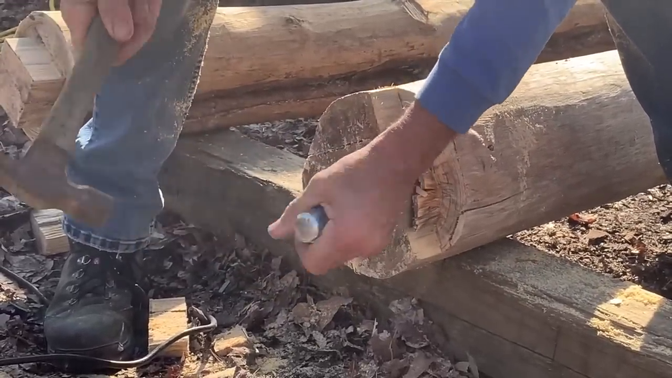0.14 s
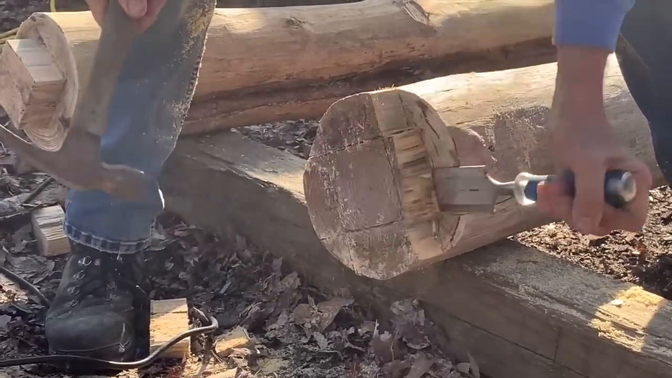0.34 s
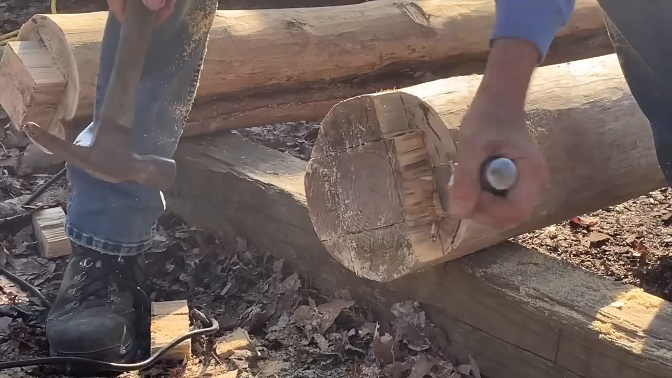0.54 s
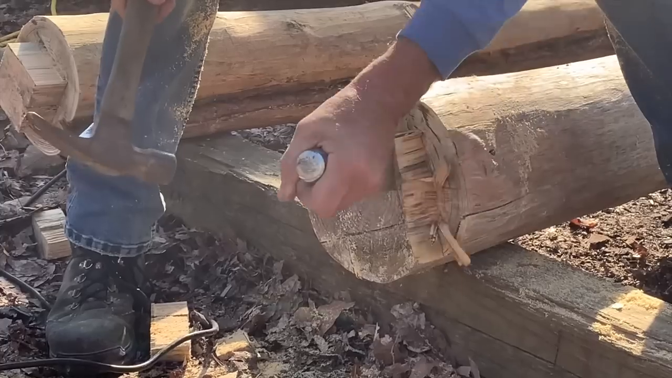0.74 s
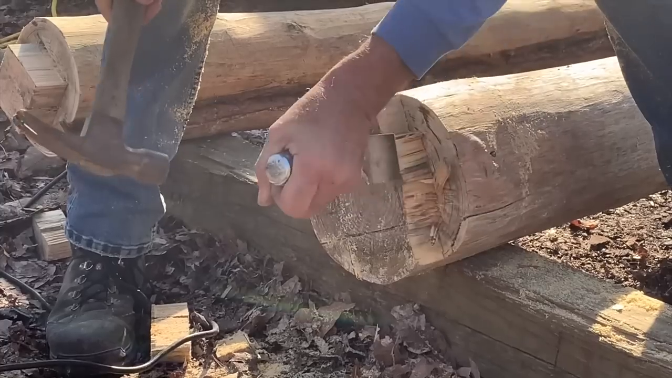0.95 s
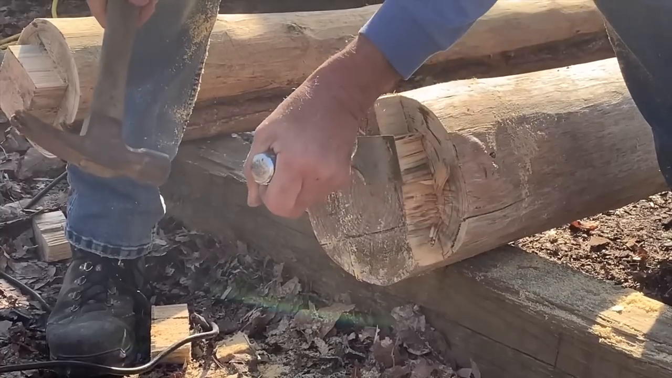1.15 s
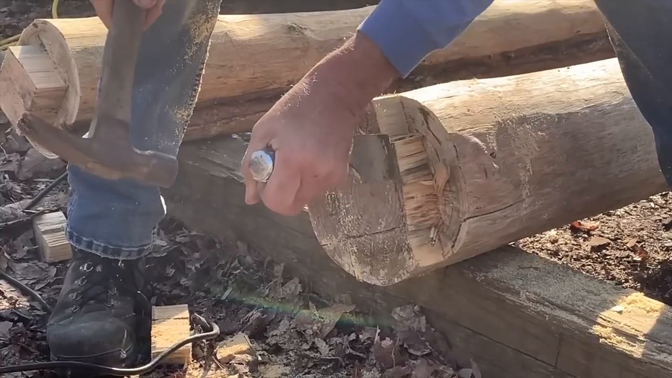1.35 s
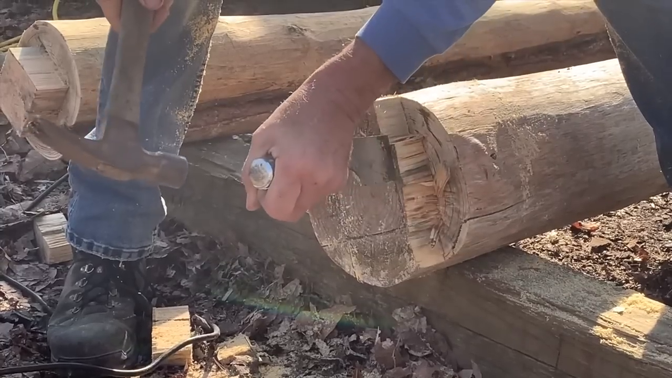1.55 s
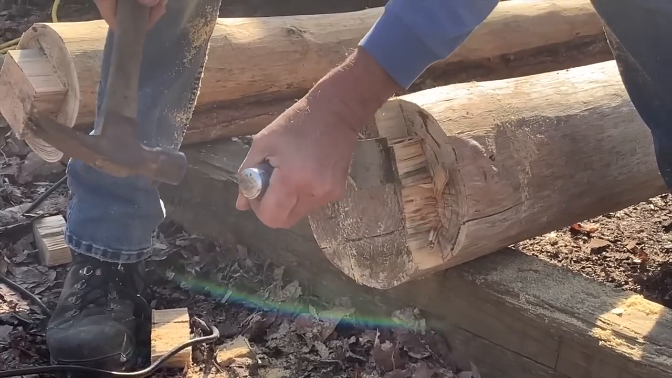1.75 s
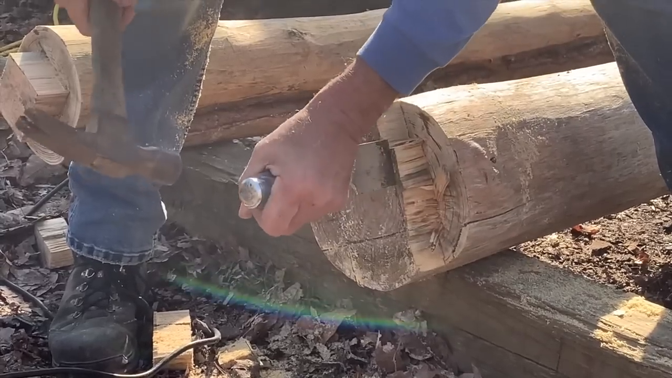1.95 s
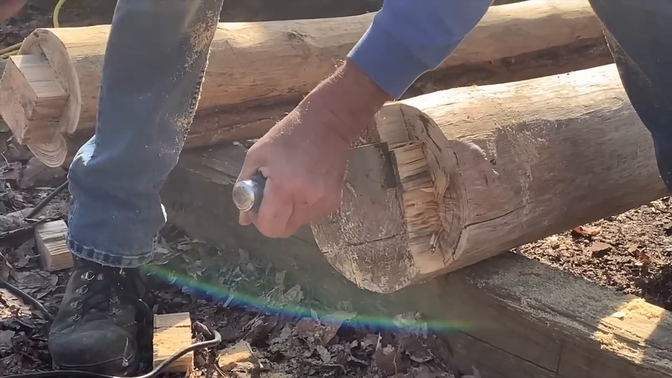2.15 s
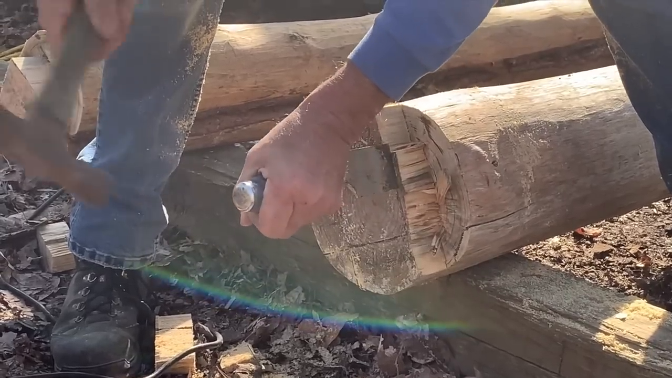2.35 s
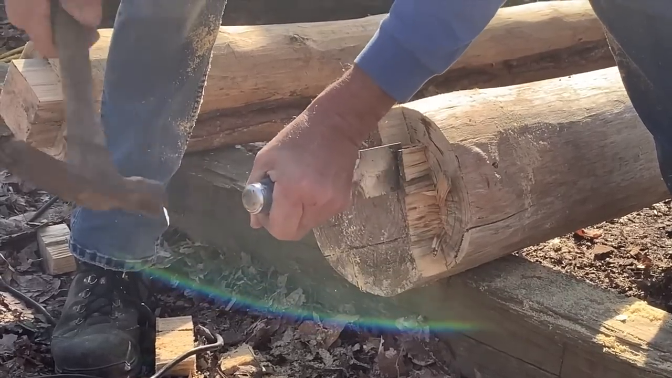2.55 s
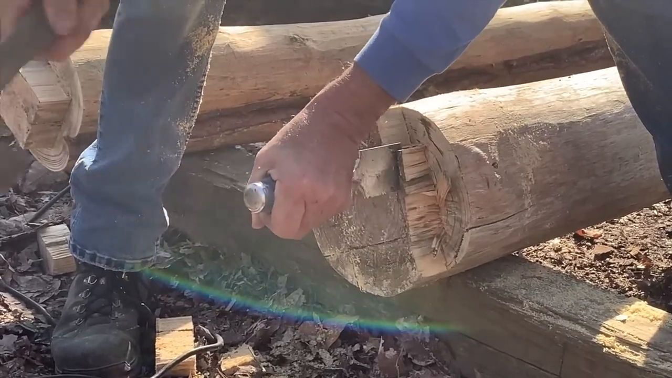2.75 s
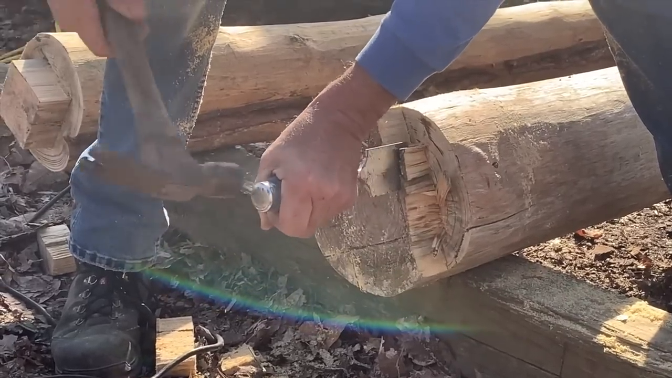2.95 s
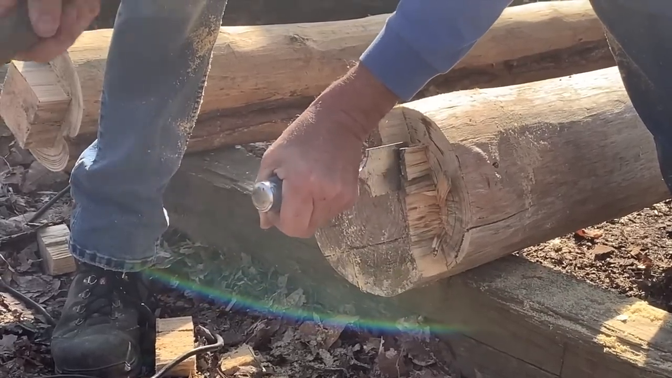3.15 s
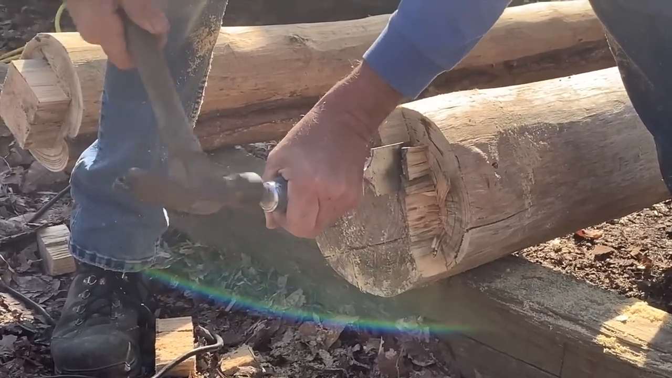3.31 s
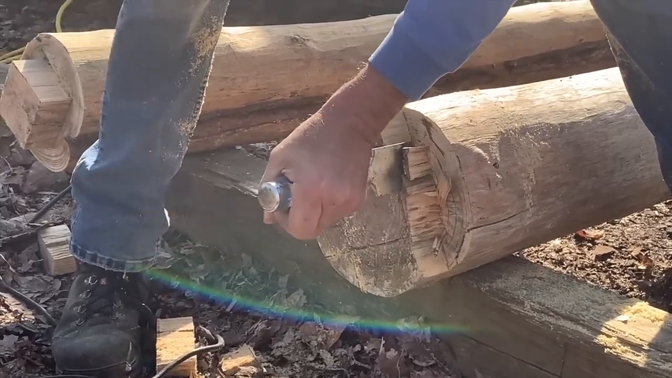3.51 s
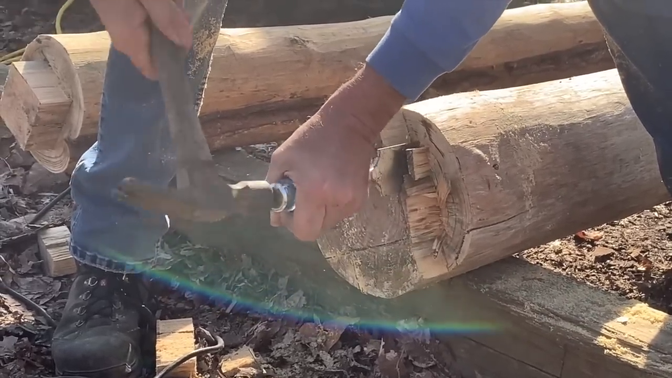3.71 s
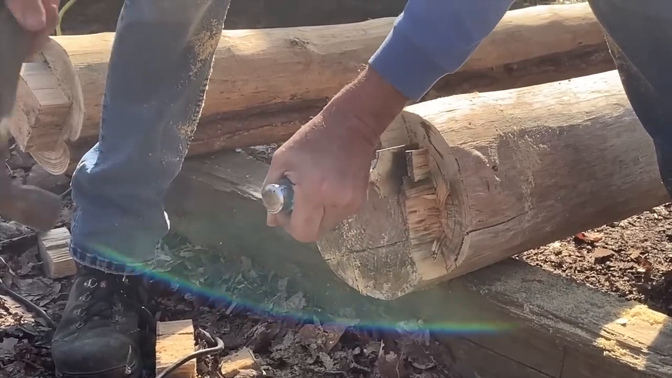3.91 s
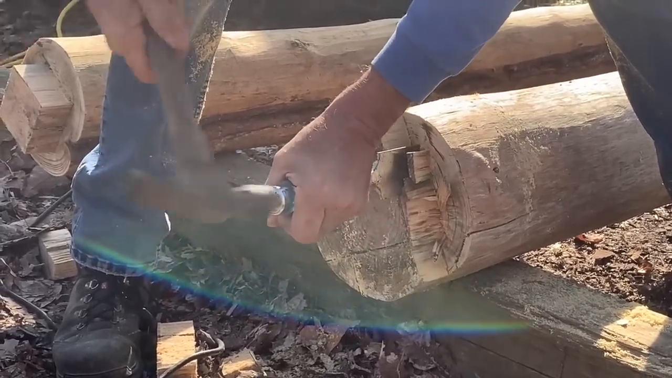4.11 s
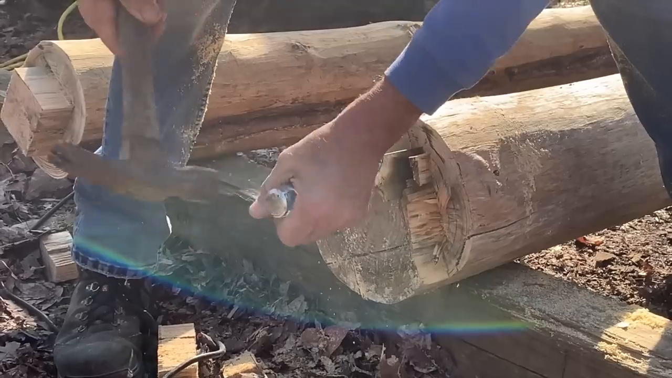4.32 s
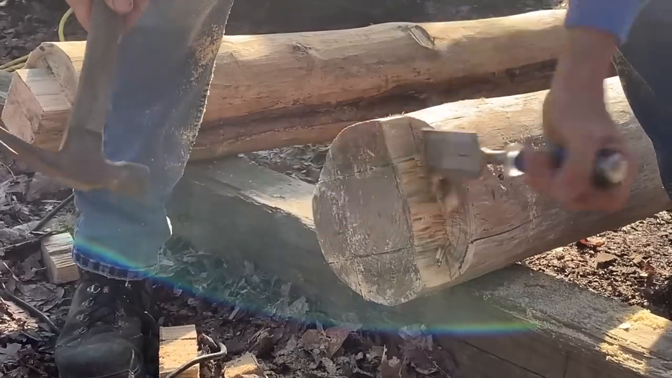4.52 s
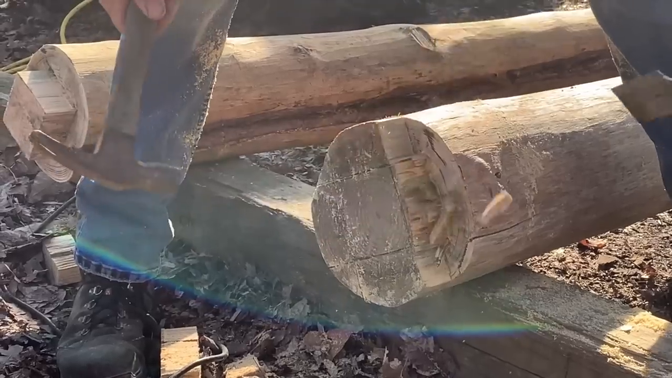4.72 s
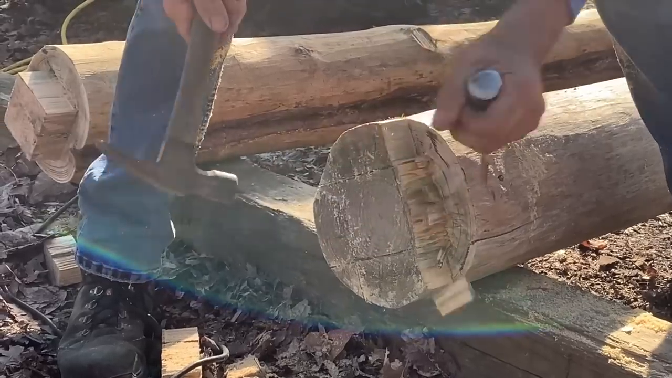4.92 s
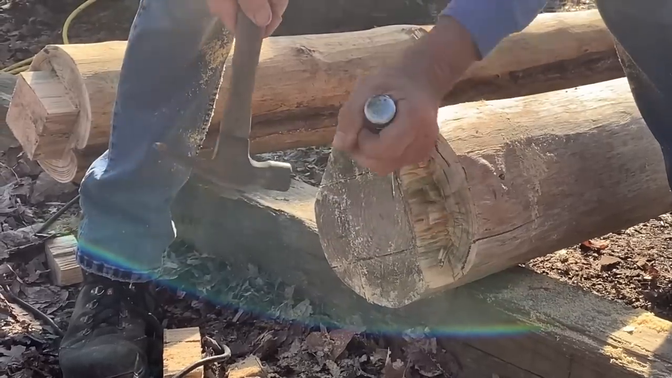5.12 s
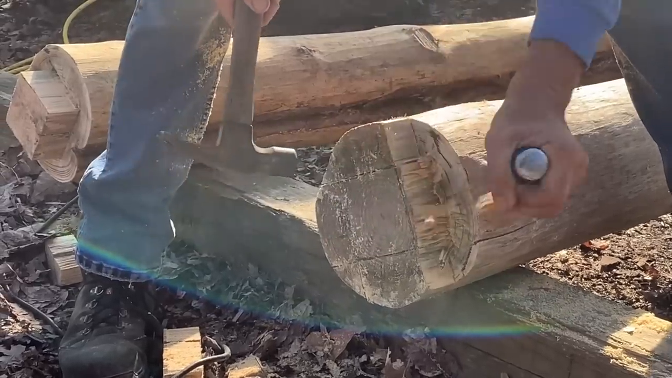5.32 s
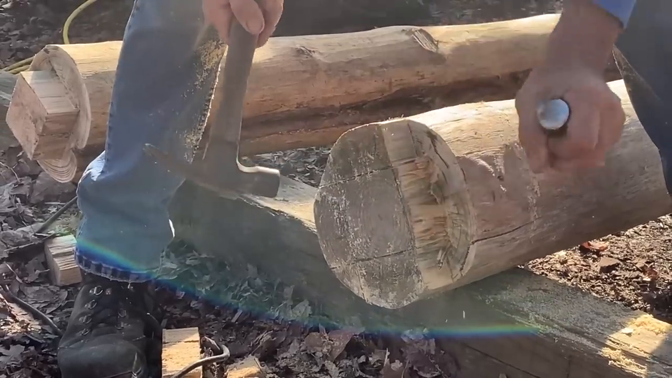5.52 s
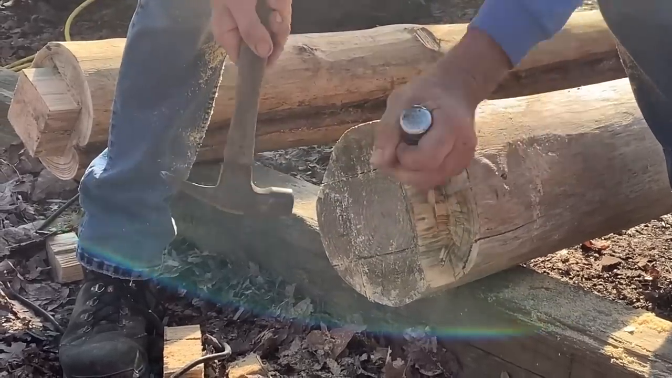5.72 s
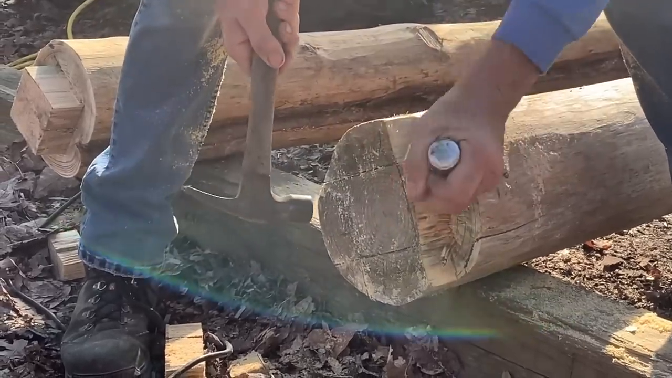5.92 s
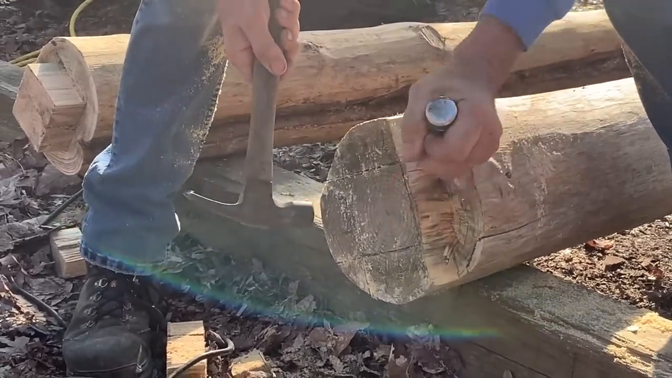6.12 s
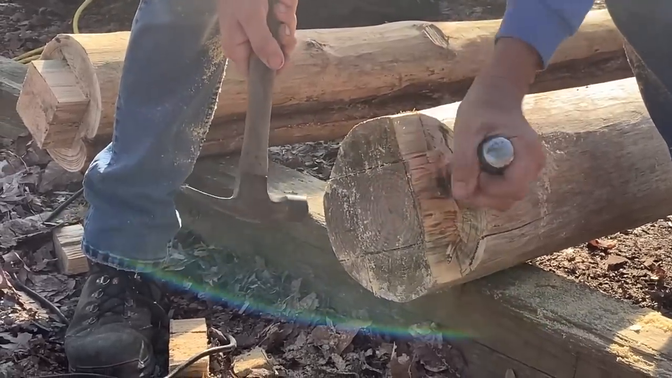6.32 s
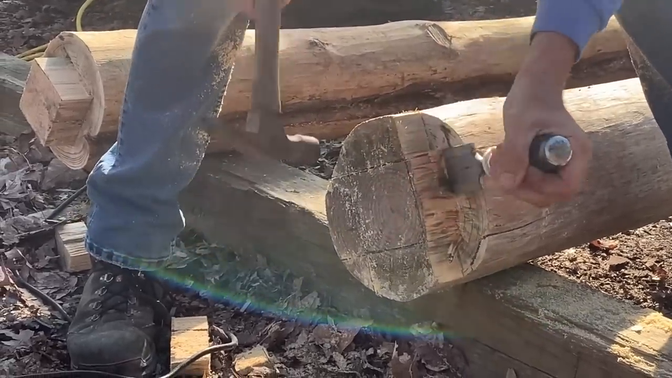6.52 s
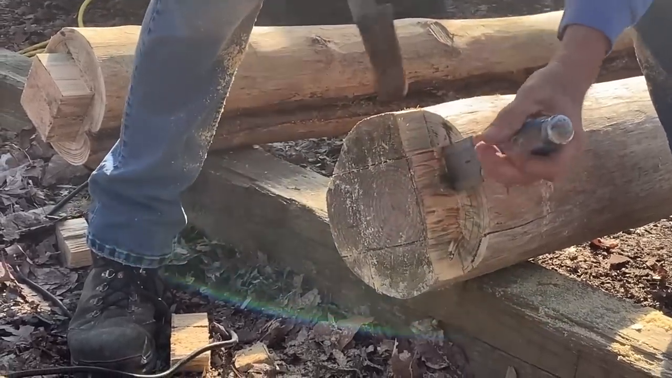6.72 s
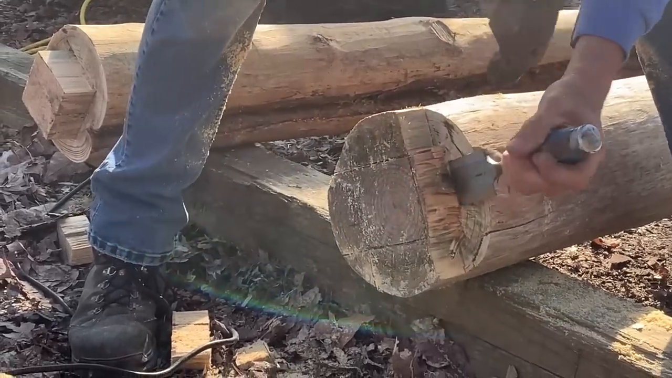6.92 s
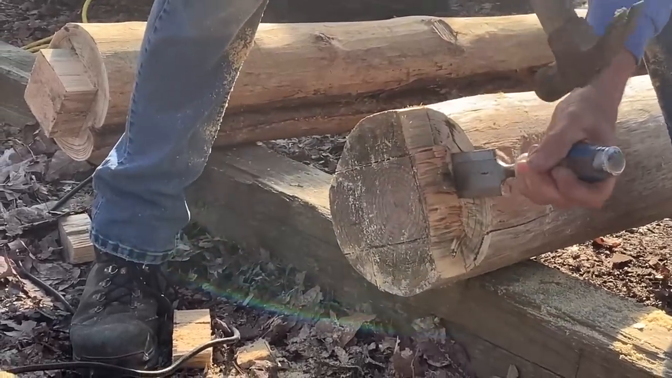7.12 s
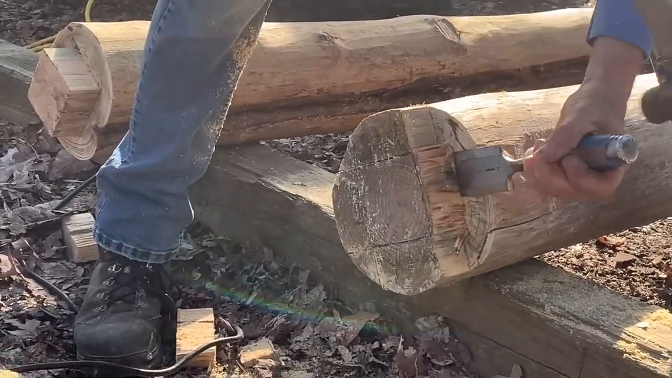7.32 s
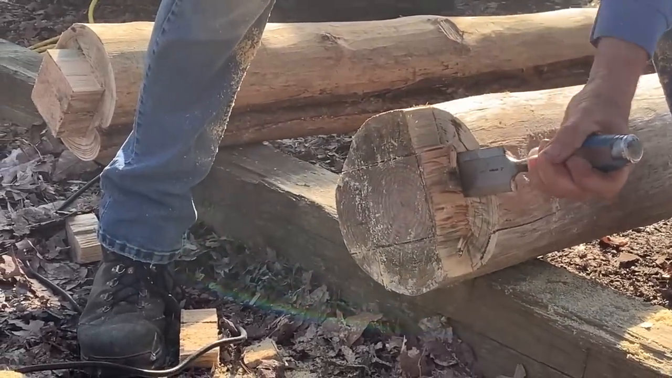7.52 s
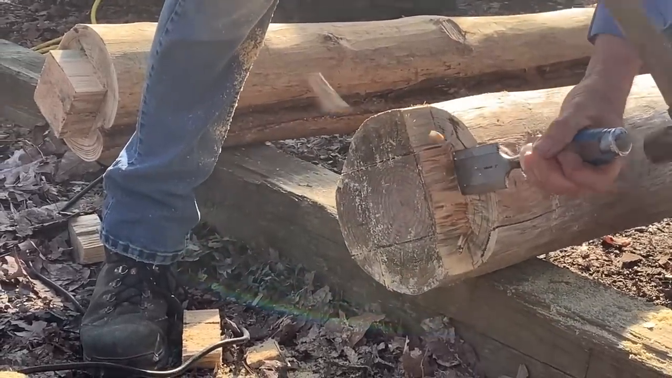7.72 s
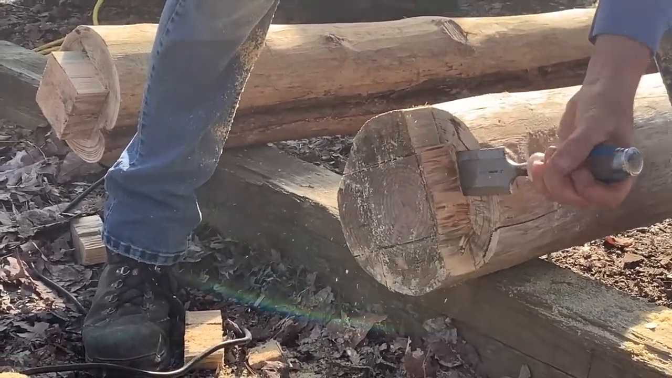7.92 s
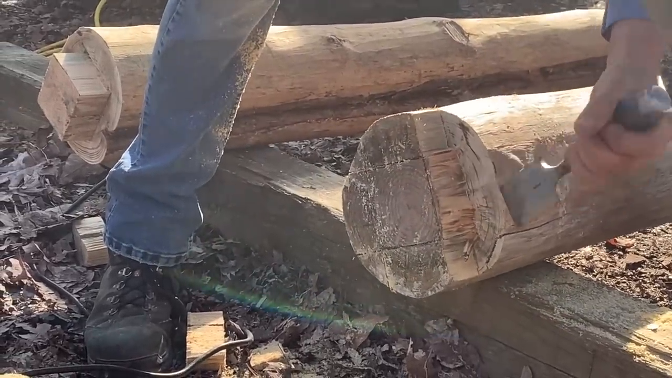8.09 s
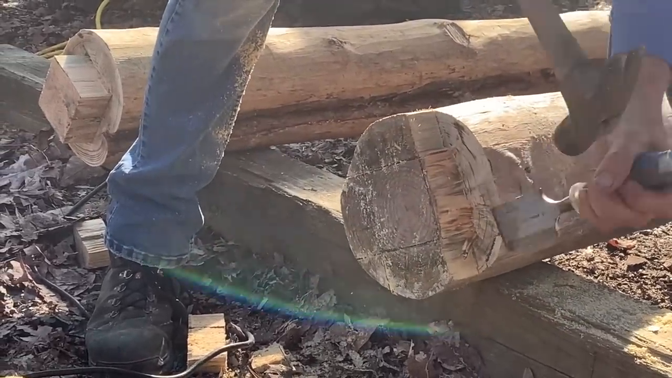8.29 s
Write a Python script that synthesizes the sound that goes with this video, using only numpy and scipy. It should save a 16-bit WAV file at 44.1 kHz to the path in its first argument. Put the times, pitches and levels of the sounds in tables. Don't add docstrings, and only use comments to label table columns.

```python
import sys
import numpy as np
from scipy import signal
from scipy.fft import rfft, irfft, next_fast_len
from scipy.io import wavfile
from scipy.ndimage import uniform_filter1d

SR = 44100
rng = np.random.default_rng(int(sys.argv[2]) if len(sys.argv) > 2 else 0)


def log_audio(samples):
    frames = np.atleast_2d(samples).T
    limited = np.clip(frames, -1, 1)
    pcm = np.round(limited * 32767).astype(np.int16)
    wavfile.write(sys.argv[1], SR, pcm)


def to_linear_factor(level_db):
    exponent = np.asarray(level_db, float) / 20
    return 10 ** exponent


N = 368235


def evened(x):
    return x / np.sqrt(np.mean(x ** 2) + 1e-20)


def read(points, hz, axis=1):
    columns = np.transpose(points)
    return np.interp(np.log(hz + 1), np.log(columns[0] + 1), columns[axis])


def humps(bands, hz):
    return sum(db * np.exp(-((hz - centre_hz) / width_hz) ** 2) for centre_hz, width_hz, db in bands)


def add(mix, s, sound):
    part = mix[max(round(s * SR), 0):][:len(sound)]
    part += sound[:len(part)]


def laid(source, rows):
    mix = np.zeros(N)
    for row in rows:
        add(mix, row[0], source(*row))
    return mix


def resonate(x, hz, width_hz):
    turn = np.exp(2j * np.pi * np.cumsum(hz * np.ones(len(x))) / SR)
    r = np.exp(-np.pi * abs(width_hz) / SR)
    return 2 * (turn * signal.lfilter([1 - r], [1, -r], x / turn)).real


def resonate_twice(x, hz, width_hz):
    return resonate(resonate(x, hz, width_hz), hz, width_hz)


def smooth_patches(shape, bands, frames):
    noise = rng.standard_normal(shape[::-1]).T
    return evened(uniform_filter1d(uniform_filter1d(noise, bands, axis=0), frames, axis=1))


def shaped(gain, same, size):
    z = rng.standard_normal((gain.shape[1], len(gain), 4)).T
    left, other = z[0] + 1j * z[1], z[2] + 1j * z[3]
    same = np.clip(same, 0, 1)
    right = same * left + np.sqrt(1 - same ** 2) * other
    return signal.istft(gain * np.array([left, right]), nperseg=size)[1]


# time in seconds, level in dB.
RUMBLE = [(0.0, -69.5), (1.35, -71.5), (1.93, -74.5), (2.74, -72.5), (3.1, -66), (3.63, -74.5), (4.35, -68),
          (4.84, -74), (5.16, -68.5), (5.81, -75), (6.09, -65), (7.18, -70), (7.8, -65), (8.35, -68.5)]
# frequency in Hz, common share.
ROAD_SAME = [(30, 0.38), (150, 0.19), (500, 0.46), (1500, 0.043), (6000, 0.057)]
# frequency in Hz, density in dB per Hz.
ROAD = [(20, -32.5), (48, -3), (99, -6), (131, -20), (250, -37.5), (700, -35), (2580, -57.5), (16500, -75)]
# centre in Hz, width in Hz, lift in dB.
ROAD_BANDS = [(557, 110, 6.5), (870, 170, 4), (229, 35, -3.5), (713, 43, -4.5), (5070, 1000, -4),
              (11000, 6400, 9)]


def road():
    hz = np.fft.rfftfreq(2048, 1 / SR)[:, None]
    t = np.arange(N // 1024 + 3) * 1024 / SR
    swell_db = np.interp(t, *np.transpose(RUMBLE)) + 63
    patches = smooth_patches((len(hz), len(t)), 14, 4)
    gusts = smooth_patches((64, len(t)), 2, 6)
    gusts = np.pad(gusts, [(0, len(hz) - len(gusts)), (0, 0)])
    busier_db = np.interp(t, [2.3, 5.8, 8.3], [0, 2, 3])
    level_db = read(ROAD, hz) + humps(ROAD_BANDS, hz) + 0.48 * patches
    level_db = level_db + 3.5 * gusts / (1 + (hz / 400) ** 2)
    level_db = level_db + swell_db / (1 + (hz / 160) ** 4) + busier_db * (hz > 150)
    return to_linear_factor(-87) * shaped(to_linear_factor(level_db), read(ROAD_SAME, hz), 2048)[:, :N] * to_linear_factor([[27], [29]])


# start in seconds, rms in dB, length
# in seconds, pitch in Hz.
BRUSHES = [(0, -65.5, 0.045, 3200), (0, -74.5, 0.3, 2660), (0.192, -61, 0.17, 4303),
           (0.377, -80, 0.16, 3510), (0.272, -61, 0.053, 2500), (0.898, -65, 0.03, 6100),
           (1.689, -88, 0.076, 8970), (1.867, -92, .05, 9150), (4.529, -44, 0.035, 5985),
           (4.656, -85.5, 0.036, 8980), (4.827, -79, 0.022, 12200), (4.873, -67.5, 0.055, 3510),
           (5.034, -69, 0.042, 3200), (5.147, -72, 0.048, 3470), (5.29, -43.5, 0.039, 5600),
           (5.292, -67, 0.17, 1190), (5.57, -66, 0.032, 4500), (5.628, -78, 0.067, 8820),
           (5.848, -82, 0.024, 9840), (5.882, -47, 0.018, 1190), (6.387, -80, 0.025, 9930),
           (6.62, -76.5, 0.095, 4500), (6.802, -85.5, 0.14, 1677), (7.127, -90, 0.11, 1774),
           (7.018, -88.5, 0.052, 8700), (7.123, -90, 0.13, 7350), (8.331, -52, 0.02, 5000),
           (7.75, -67, .19, 500), (7.87, -65, 0.065, 800), (7.95, -69, .19, 700), (5.845, -68, .04, 14070),
           (5.64, -70, 0.026, 14000)]


def brush(s, db, length_s, hz):
    noise = rng.standard_normal((SR // 5, 2))[:round(length_s * SR)].T
    grain = noise[0] * to_linear_factor(4.1 * evened(uniform_filter1d(noise[1], 60)))
    sound = evened(resonate_twice(grain, hz, 1064 + 0.84 * hz))
    if hz > 3000:
        sound = sound + to_linear_factor(-0.5) * evened(resonate_twice(grain, 12000, 6000))
    fade = signal.windows.tukey(len(grain), 0.6) * to_linear_factor(np.linspace(4, -6, len(grain)))
    return to_linear_factor(db) * sound * fade


def snap(s, db, hz, bright_db, knock_db):
    t = np.arange(SR // 20) / SR
    crack_t60_ms, spike = 9.3, 0.99
    crack = rng.standard_normal(len(t)) * to_linear_factor(-60000 * t / crack_t60_ms) * (1 + spike * np.exp(-t / 0.00024))

    def band(hz, width_hz):
        return evened(resonate(resonate(crack, hz, width_hz), hz, 2 * width_hz))

    width_hz = 590 * max(hz / 4000, 1) ** 0.7
    body_db = -4.5 - 7.5 * abs(np.log2(hz / 4000))
    chip = band(hz, width_hz) + to_linear_factor(body_db) * (band(3600, 1800) + 0.17 * band(2250, 500))
    chip = chip + to_linear_factor(-3.5) * band(7200, 2700)
    low_cut = signal.butter(2, min(0.824 * hz, 2000), "high", fs=SR)
    chip = signal.lfilter(*low_cut, chip)
    bright = to_linear_factor(bright_db) * band(rng.uniform(8400, 10000), 4600) + to_linear_factor(bright_db - 6.5) * band(12000, 3000)
    knock = to_linear_factor(knock_db) * (band(930, 970) + 0.37 * band(1600, 2400))
    sound = chip + bright + knock
    return to_linear_factor(db) * sound / np.sqrt(uniform_filter1d(sound ** 2, size=22).max())


def snaps(rows, bright_db, knock_db):
    def one(s, db, hz):
        return snap(s, db, hz, bright_db + 4 * np.log2(hz / 4000), knock_db)
    return laid(one, rows)


# start in seconds, peak in dB, pitch in Hz.
TAPS = [(0.0604, -59, 5230), (0.903, -47.5, 7500), (3.7666, -27, 2160), (4.1916, -29, 2020),
        (4.3829, -46.5, 2350), (4.394, -49.5, 2370), (4.403, -31, 6015), (4.4322, -33.5, 1980),
        (4.554, -23, 4150), (4.5653, -37, 8000), (4.7404, -60.5, 1500), (4.761, -55, 1596),
        (4.8813, -47, 8400), (5.0373, -48, 1495), (5.155, -42.5, 7000), (5.2589, -31, 1697),
        (5.2685, -33, 6980), (5.306, -24, 6760), (5.3148, -19, 10600), (5.321, -30, 7600),
        (5.366, -39, 1865), (5.3712, -37, 1810), (5.5766, -44.5, 8300), (5.637, -33, 4000),
        (5.7175, -50, 1550), (5.8882, -36, 7140), (5.8894, -42.5, 1530), (8.0576, -59, 9100),
        (8.333, -36, 4100)]


def taps():
    return snaps(TAPS, bright_db=-8.5, knock_db=-3)


# start in seconds, peak in dB, pitch in Hz.
FIBRES = [(0.1842, -41.5, 9120), (0.2003, -43, 4300), (0.2663, -37, 9000), (0.326, -48, 11000),
          (0.333, -42.5, 9000), (0.1945, -32, 4250), (0.2062, -38.5, 4700), (0.2102, -23, 4100),
          (0.219, -41, 3850), (0.228, -20.5, 3830), (0.2324, -25.5, 4060), (0.2400, -20, 3180),
          (0.246, -32, 4200), (0.25, -25.5, 4130), (0.262, -37.5, 6800), (0.271, -32.5, 3050),
          (0.295, -23.5, 8400), (0.338, -30, 8400), (0.341, -17.5, 7970), (0.359, -20, 6640),
          (0.361, -17.5, 3514), (0.3608, -21, 6300), (0.913, -43, 4650), (4.4697, -17.5, 9790),
          (4.4848, -24, 10000), (4.5009, -9, 8600), (4.547, -22.5, 8080), (5.2894, -16.5, 4105),
          (5.3254, -31, 8400)]
# start in seconds, peak in dB, pitch in Hz.
CRUMBS = [(0.569, -70, 8880), (.997, -69.5, 9000), (1.3937, -71.5, 6800), (1.769, -68, 8400),
          (4.8276, -64.5, 7100), (5.7628, -65.5, 8970), (6.9057, -66.5, 11000), (7.551, -71, 6010),
          (8.11, -59.5, 4500)]


def fibres():
    return snaps(FIBRES + CRUMBS, bright_db=-4.5, knock_db=-23.5)


# start in seconds, peak in dB, pitch in Hz.
DULL_CRACKS = [(.271, -43, 2263), (4.157, -28, 2197), (4.4026, -26.5, 2300), (4.5008, -24, 4300),
               (4.5476, -38.5, 2198), (4.5542, -32, 2501), (5.155, -52, 2190), (5.268, -41, 2220),
               (5.2893, -18, 6800), (5.3022, -28.5, 4178), (5.321, -40, 2300), (5.325, -38, 2800),
               (7.551, -62, 4150), (.903, -56, 2190)]


def dull_cracks():
    return snaps(DULL_CRACKS, bright_db=-20, knock_db=-13)


# frequency in Hz, t60 in seconds, rise in ms, level in dB, dB per dB of place.
LOG = [(73, 0.12, 5.9, 0, 0), (138, 0.11, 8.3, -0.5, 0), (301, 0.25, 4.6, -0.5, 0.5),
       (531, 0.21, 1.7, -0.5, 1)]
# start in seconds, bending in dB, rocking in dB,
# place in dB towards the rim, heave on its bearers in dB.
SHAKES = [(0.24, -51.5, -51.5, -4, -55), (0.362, -56, -47.5, -2.5, -50.5), (2.409, -33.5, -38, 4.5, -38),
          (2.839, -21, -44, -13.5, -38), (3.255, -21, -39, -13, -32.5), (3.729, -28, -36.5, -4.5, -31.5),
          (4.143, -30, -33.5, -4, -33.5), (4.421, -22.5, -52, -21.5, -53), (4.556, -41, -40, 5, -48.5),
          (5.153, -65.5, -48.5, 8.5, -62), (5.308, -39.5, -39, 5, -63), (5.889, -38, -34.5, 1.5, -43),
          (6.267, -56.5, -50, -11, -63), (6.409, -62, -61, -6, -67), (6.54, -62.5, -66, -11, -66.5),
          (6.84, -66, -60, -8, -63), (6.94, -66, -57.5, -11, -59), (8.05, -58.5, -64.5, -6, -63),
          (7.7004, -23, -18.5, -12, -33.5)]
RINGS = [1, 0.87, 0.94, 0.65, .6, 0.99, 1, 1, 0.97, 1.43, 0.98, 0.82, 1.4, 0.74, 0.96, .8, 0.76, .8, 1.21]
SIDEWAYS = [1, 1, 1.6, 1.6, 1.8, 1.6, 1.6, 1.79, 1.4, 1, 1.2, .9, 1, 1, 1, 1, 1, 1, 0.59]
# start in seconds, bending in dB,
# rocking in dB, place in dB, heave in dB, ring share, twin share.
BOUNCES = [
    (7.7171, -19, -42, -20, -60, 1.1, .2),
    (2.88, -46, -53, -8, -56, .7, 1),
    (3.292, -45, -51, -11, -46.5, 0.77, 0.94),
    (3.766, -45, -45, -6, -54, .7, 0.95),
    (4.191, -50, -46, 3, -52, 0.75, 0.85),
]


def shake(s, bend_db, rock_db, place_db, heave_db, ring, sideways):
    t = np.arange(SR // 3) / SR
    modes_db = [heave_db, rock_db] + [bend_db + db + lean * place_db for _, _, _, db, lean in LOG[2:]]
    twin_shares = [0.3, 0.3, sideways, 0.3]
    modes = np.zeros(len(t))
    for mode_db, share, (hz, t60_s, rise_ms, _, _) in zip(modes_db, twin_shares, LOG):
        hz = hz * rng.uniform(0.99, 1.007)
        lag_turns = 0.42 + rng.uniform(-1.9, 1) / 10
        twin = np.sin(2 * np.pi * (1.04 * hz * t - lag_turns))
        pair = (np.sin(2 * np.pi * hz * t) + share * twin) / np.hypot(1, share)
        modes += to_linear_factor(mode_db + 2 - 60 * t / (t60_s * ring)) * (1 - np.exp(-1000 * t / rise_ms)) * pair
    noise = rng.standard_normal(len(t)) * to_linear_factor(-60 * t / 0.14) * (1 - np.exp(-t / 0.00064))
    thud = to_linear_factor(rock_db + 24.5) * resonate(resonate(noise, 170, 140), 240, 110)
    rattle = to_linear_factor(modes_db[3] + 4.5) * resonate_twice(noise, 630, 300)
    bump = to_linear_factor(heave_db + 19.5) * resonate_twice(noise, 100, 59)
    return modes + thud + rattle + bump


# start in seconds, rms in dB, length in seconds,
# start pitch in Hz, end pitch in Hz.
WHISTLES = [(0.817, -84, 0.024, 2510, 2340), (1.751, -88, 0.33, 1712, 1670),
            (5.307, -73.5, 0.31, 4324, 3730), (6.021, -89.5, 0.14, 7900, 6900),
            (6.359, -87.5, 0.2, 4700, 4670), (6.514, -83, 0.2, 4700, 4720), (5.399, -84, 0.22, 1740, 1700),
            (6.811, -77, 0.048, 12300, 12220), (6.82, -91.5, 0.055, 4700, 4700),
            (5.2836, -33, 0.0067, 6260, 7300), (5.2843, -32, .007, 12500, 14600)]


def whistle(s, db, length_s, start_hz, end_hz):
    width_hz = 60 + 1.2 * length_s ** 2 * end_hz
    noise = rng.standard_normal(SR // 2)[:round(length_s * SR)]
    hz = end_hz + (start_hz - end_hz) * np.linspace(1, 0, len(noise)) ** 2
    tone = evened(resonate_twice(noise, hz, width_hz))
    return to_linear_factor(db) * tone * signal.windows.tukey(len(noise), 0.5)


# frequency in Hz, width in Hz, level in dB.
STEEL = [(1271.3, 170, 0.5), (1410, 110, 8), (2160, 87, 1.5), (2370, 65, 3.5), (3200, 410, -4.5),
         (3550, 520, 3), (4700, 67, -15), (7121, 300, 2.5), (8400, 500, 8), (11000, 2300, -1.5),
         (13900, 580, -6), (14900, 300, 4)]
# start in seconds, peak in dB, drive into #
# the wood in ms, handle knock in dB, blade ring in dB.
BLOWS = [
    (2.4051, -11, 8, 2, 9.5),
    (2.8397, -10, 7.3, -4, 0),
    (3.2544, -11, 6.5, 0, -1),
    (3.7286, -9, 6.2, -6, 0.5),
    (4.1438, -10.5, 5.5, -11, -6.5),
    (4.419, -10, 0.89, 4, 1),
    (7.6976, -10, 5.2, -5, -5),
]
# dB near 3.5 kHz, near 8 kHz, near 12 kHz, one per blow.
LANDINGS = [(-1, 2, 3.5), (-1, 3, 0), (-1, 0, -3), (-0.5, 2, -2), (-2.5, -3, -1.5), (-5, -2, -4.5),
            (0, 3.5, -2)]


def blow(s, db, drive_ms, knock_db, ring_db, edge_db, bright_db, top_db):
    t = np.arange(SR // 20) / SR
    grit = rng.standard_normal(len(t)) * to_linear_factor(5.6 * np.minimum(rng.exponential(1, len(t)), 4))
    stopped_s = np.maximum(t - drive_ms / 1000, 0)
    moving = np.minimum(t / 0.0003, 1) * to_linear_factor(-300 * t - 6000 * stopped_s)
    tearing = grit * moving * (1 + 0.51 * np.exp(-t / 0.00051))
    lean = [(1500, knock_db), (2000, ring_db), (2500, ring_db), (3100, edge_db), (5000, edge_db),
            (7000, bright_db), (9000, bright_db), (11000, top_db)]
    rings = np.zeros(len(t))
    for hz, width_hz, peak_db in STEEL:
        rings += to_linear_factor(peak_db + read(lean, hz)) * resonate(tearing, hz * rng.uniform(1.0, 1.02), width_hz)
    face = rng.standard_normal(len(t)) * np.exp(-t / 0.00047)
    face = face * evened(tearing).max() * tearing.std() / 4
    tick = to_linear_factor(6 + top_db) * resonate(resonate(face, 11000, 2500), 11000, 3500)
    sound = rings + tick + to_linear_factor(-10.5 + top_db) * resonate_twice(tearing, 14000, 5600)
    return to_linear_factor(db) * sound / np.sqrt(uniform_filter1d(sound ** 2, size=88).max())


def blows(prying):
    rows = [row + landing for row, landing in zip(BLOWS, LANDINGS) if (row[2] < 2) == prying]
    return laid(blow, rows)


# start in seconds, level in dB.
SINGS = [
    (2.408, -44),
    (2.842, -41.5),
    (3.258, -40),
]


def sing(s, db):
    t = np.arange(SR // 5) / SR
    hz, t60_s = 4737, 0.2
    tone = np.sin(2 * np.pi * hz * t) + 0.15 * np.sin(2 * np.pi * (hz + 25) * t)
    return to_linear_factor(db - 60 * t / t60_s) * tone


# frequency in Hz, t60 in seconds.
UPPER = [(727, 0.26), (818, 0.17), (1065, 0.11), (1440, 0.096)]
# start in seconds, level of each mode in dB.
UPPER_SHAKES = [(2.409, -52.5, -47.5, -53, -56), (2.842, -55, -44.5, -44, -59),
                (3.257, -48.5, -49, -44, -40), (3.73, -40, -42, -40, -50), (4.146, -44, -45.5, -37, -61),
                (4.421, -58.5, -56, -36, -60), (4.556, -65, -65, -44.5, -51), (5.307, -50, -58, -64.5, -62),
                (5.888, -51, -61, -49.5, -51), (7.7, -57, -44.5, -43, -43.5),
                (4.19, -46.5, -60, -56.5, -60)]


def upper_shake(s, *modes_db):
    t = np.arange(SR // 4) / SR
    sound = np.zeros(len(t))
    for db, (hz, t60_s) in zip(modes_db, UPPER):
        tone = np.sin(2 * np.pi * hz * rng.uniform(1.0, 1.01) * t)
        sound += to_linear_factor(db + 3.5 - 60 * t / t60_s) * (1 - np.exp(-t / 0.0018)) * tone
    return sound


# start in seconds, end level in dB, length in seconds,
# frequency in Hz, width in Hz.
FORERUNS = [
    (3.703, -48, 0.025, 720, 30.2),
    (3.708, -42, .02, 3500, 1200),
    (3.235, -42, .019, 4600, 1200),
    (2.825, -42, .014, 4500, 1500),
    (4.115, -54, .028, 1650, 90.7),
    (4.12, -37, 0.023, 3700, 393),
    (7.664, -35.5, 0.037, 1130, 40.5),
    (7.672, -48, 0.035, 1750, 67),
    (7.672, -33, 0.026, 7100, 500),
    (7.678, -38.5, 0.019, 4100, 830),
]


def forerun(s, db, length_s, hz, width_hz):
    noise = rng.standard_normal(SR // 20)[:round(length_s * SR)]
    swell = np.linspace(0, 1, len(noise)) ** 1.4 * signal.windows.tukey(len(noise), 0.1)
    return to_linear_factor(db) * evened(resonate_twice(noise, hz, width_hz)) * swell


BLOCK = 4.4188, [(1132, -10, .016), (1400, -9, .013), (1593, -11, .014), (2013, -13, .013),
         (2211, -15, 0.018)]


def block():
    t = np.arange(SR // 20) / SR
    sound = np.zeros(len(t))
    for k, (hz, db, t60_s) in enumerate(BLOCK[1]):
        sound += (-1) ** k * to_linear_factor(db - 60 * t / t60_s) * np.sin(2 * np.pi * hz * t)
    return sound


# frequency in Hz, t60 in seconds.
NEAR_T60_S = [(500, 0.21), (2000, 0.14), (5000, 0.2), (14000, 0.011)]
# frequency in Hz, t60 in seconds.
FAR_T60_S = [(500, 4.7), (2500, 1.5), (6000, 0.79), (11000, 0.78), (15000, .45)]
# frequency in Hz, level in dB.
TREES = [(350, -33.5), (700, -9), (1700, -9.5), (6000, -2.5), (11000, -8.5), (16000, -9.5)]
# centre in Hz, width in Hz, lift in dB.
TREE_BANDS = [(2300, 210, 15), (3600, 640, 10.5), (4500, 64, 1.5), (7300, 1500, 1.5), (14950, 500, 11.5)]
# delay in seconds, level in dB.
WALLS = [(.236, -38.5), (0.408, -47.5)]


def yard(near_x, far_x):
    hz, frames, z = signal.stft([near_x, far_x], SR, nperseg=256)
    power = abs(uniform_filter1d(abs(z) ** 2, size=17, axis=1))
    hz, t = hz[:, None], frames[:400]
    near_db = -28.5 - 60 * t / read(NEAR_T60_S, hz) + read([(3000, 10.5), (8000, -10)], hz)
    near = to_linear_factor(near_db) ** 2 * (t > 0.004)
    favoured_db = humps(TREE_BANDS, hz)
    far_db = -39 - 60 * t / read(FAR_T60_S, hz) + read(TREES, hz) + favoured_db
    far = to_linear_factor(far_db) ** 2 * (t > 0.01)
    wall_loss_db = 8 + read([(1500, 8), (2500, 0), (4500, 0), (8000, 30)], hz)
    for delay_s, db in WALLS:
        far = far + to_linear_factor(db + favoured_db - wall_loss_db) ** 2 * (abs(t - delay_s) < 0.004)
    energy = sum(signal.fftconvolve(p, tail, axes=1)[:, :len(frames)] for p, tail in zip(power, (near, far)))
    lumps = to_linear_factor(3.2 * smooth_patches(energy.shape, 2, 8))
    return shaped(np.sqrt(abs(energy)) * lumps, 0.11, 256)[:, :N]


def scene():
    deep, shallow = blows(prying=False), blows(prying=True)
    small = fibres() + taps() + laid(brush, BRUSHES)
    add(shallow, BLOCK[0], block())
    no_bass = signal.butter(1, 600, "high", fs=SR)
    deep, shallow, small = signal.lfilter(*no_bass, [deep, shallow, small])
    to_near = deep + to_linear_factor(-6) * shallow + to_linear_factor(-3.5) * small
    to_far = deep + to_linear_factor(-9) * shallow + to_linear_factor(-16) * small
    pushes = [row + (ring, sideways) for row, ring, sideways in zip(SHAKES, RINGS, SIDEWAYS)]
    log = laid(shake, pushes) + laid(shake, BOUNCES) + laid(upper_shake, UPPER_SHAKES)
    thin = laid(forerun, FORERUNS) + laid(sing, SINGS) + laid(whistle, WHISTLES) + dull_cracks()
    return deep + shallow + small + yard(to_near, to_far) + log + thin + road()


# start in seconds, end in seconds.
CLATTER = [
    (.18, .365),
    (4.393, 4.53),
    (5.245, 5.4),
]


def in_clatter(t):
    return sum((t > start_s) * (t < end_s) * 1.0 for start_s, end_s in CLATTER)


# frequency in Hz, left in dB, right in dB.
SMEAR = [(711, -38, -32), (1500, -23.5, -16.5), (4000, -26, -19), (7150, -27.5, -23.5),
         (8600, -72.5, -71.5)]


def smear(x, size, db=0):
    hz, t, z = signal.stft(x, SR, nperseg=size)
    loud = np.sqrt(abs(uniform_filter1d(abs(z) ** 2, size=size // 80, axis=1)))
    luck_db = 7 * rng.standard_normal((len(t), len(hz) // 8 + 1, 2)).T.repeat(8, 1)[:, :len(hz)]
    under_db = np.array([read(SMEAR, hz, axis=1), read(SMEAR, hz, axis=2)])[..., None]
    turn = np.exp(2j * np.pi * rng.random((len(t), len(hz), 2)).T)
    noise = loud * to_linear_factor(db + under_db + luck_db - 22 * in_clatter(t)) * turn
    return signal.istft(noise, nperseg=size)[1][:, :N]


# from in Hz, to in Hz, threshold in dB.
STARVED = [(8000, 9050, -74), (12500, 14000, -64), (14000, 14700, -88), (15300, 17000, -84)]


def starve(x):
    hz, t, z = signal.stft(x, SR, nperseg=1024)
    keep = np.ones(z.shape[1:])
    wander = rng.standard_normal((len(t), 2 * len(STARVED)))
    wander_hz = 250 * evened(uniform_filter1d(wander, size=4, axis=0)).T
    for k, (lo_hz, hi_hz, db) in enumerate(STARVED):
        weak = (abs(z[:, (hz >= lo_hz) & (hz < hi_hz)]) ** 2).mean((0, 1)) < to_linear_factor(db) ** 2
        above = hz[:, None] >= lo_hz + wander_hz[2 * k]
        below = hz[:, None] < hi_hz + wander_hz[2 * k + 1]
        keep *= 1 - weak * (1 - in_clatter(t)) * above * below
    return signal.istft(z * keep, nperseg=1024)[1][:, :N]


def patchy(x):
    hz, t, z = signal.stft(x, SR, nperseg=256)
    bands = abs(z[:, :128].reshape(2, 16, 8, -1) ** 2).mean(2)
    luck_db = 8 * rng.standard_normal((len(t) // 2 + 1, 16, 2)).T.repeat(2, 2)[..., :len(t)]
    weak = (bands < to_linear_factor(-76 + luck_db) ** 2).repeat(8, 1)
    weak = weak * (hz[:128, None] > 3000) * in_clatter(t)
    keep = np.pad(1 - weak, [(0, 0), (0, 1), (0, 0)])
    return signal.istft(z[:, :129] * keep, nperseg=256)[1][:, :N]


def top_cut(x):
    return signal.sosfilt(signal.butter(12, 16930, fs=SR, output="sos"), x)


# frequency in Hz, right channel turned back in radians, right over left in dB.
WIDEN = [(0, 0, -1), (150, 1.8, -2), (300, 4.6, -2), (950, 14.6, .5), (2100, 15.6, 2), (3800, 20.2, 3),
         (4150, 18.3, 5), (5300, 21.8, 8), (6300, 20.3, .5)]


def record(dry):
    lead_samples, edge_hz = 9, 15900
    size = next_fast_len(N + SR // 10)
    hz = np.fft.rfftfreq(size, 1 / SR)
    at_hz, radians, right_db = np.transpose(WIDEN)
    phase = 2 * np.pi * hz * lead_samples / SR - np.interp(hz, at_hz, radians)
    turn = to_linear_factor(np.interp(hz, at_hz, right_db)) * np.exp(1j * phase)
    wide = irfft(rfft(dry, size) * [turn ** 0, turn] / (1 + (hz / edge_hz) ** 60), size)[:, :N]
    smeared = wide + smear(wide, size=2048) + smear(wide, size=512, db=7.5)
    finished = np.clip(patchy(starve(smeared)), -1, 1)
    return top_cut(finished)


dry = scene()
out = record(dry)
log_audio(out)
```